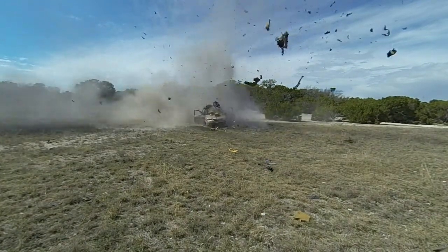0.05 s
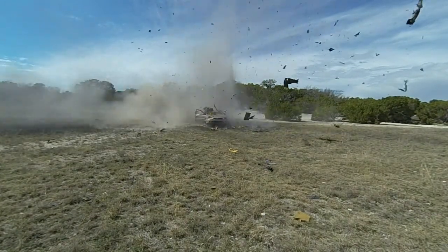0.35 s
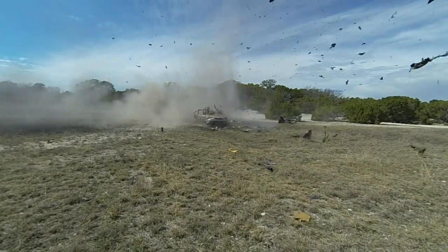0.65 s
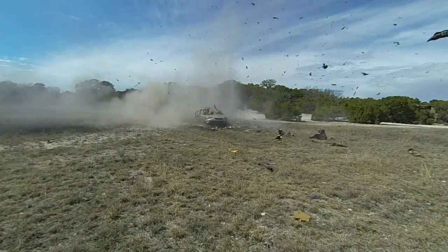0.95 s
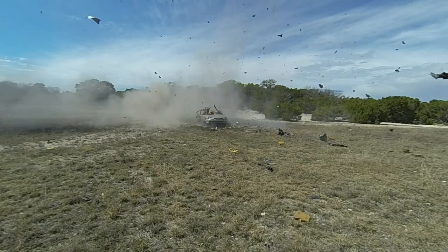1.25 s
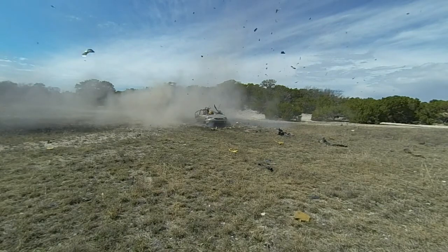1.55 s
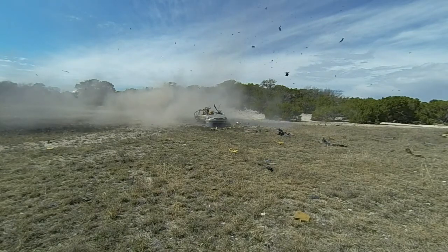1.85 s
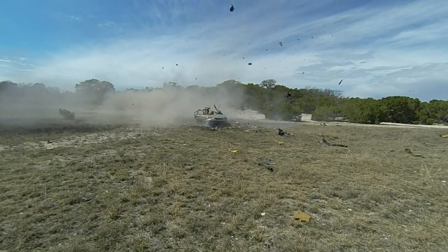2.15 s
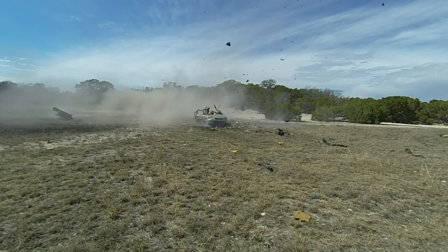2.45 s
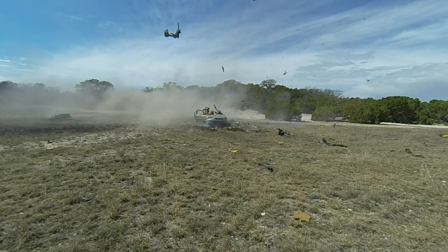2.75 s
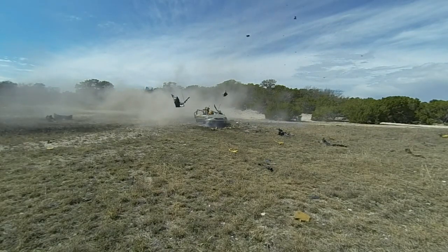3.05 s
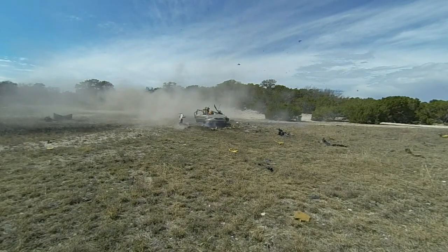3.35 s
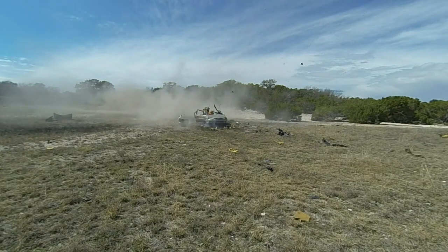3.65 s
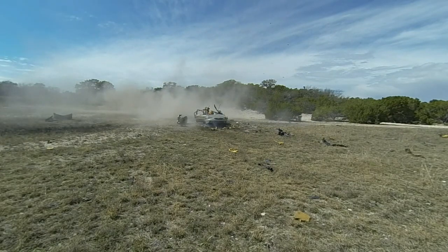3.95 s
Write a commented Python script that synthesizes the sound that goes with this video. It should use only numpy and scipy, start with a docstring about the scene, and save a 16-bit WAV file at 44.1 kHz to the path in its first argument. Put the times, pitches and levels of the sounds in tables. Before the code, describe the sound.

Falling wreckage thuds and cracks in dry grass outdoors while the rumble of a blast fades into wind. The impacts thin out, with one sharp, loud slam, a brief whirr, a second slam and a few faint metal clinks.

```python
"""Wreckage falling after an explosion

The roar of a blast dies away over a dry field, where wind rumbles and an insect trills. Each falling
piece excites a short, damped vibration: clods thud, splinters crack in the grass and steel clinks.
Two heavy panels slam down, one whirring in the air as it sheds eddies. Ground and trees scatter the
impacts, and a limiter ducks under the hardest slam and slowly recovers."""
import sys
import numpy as np
from scipy import signal
from scipy.fft import rfft, irfft
from scipy.io import wavfile
from scipy.ndimage import uniform_filter1d, minimum_filter1d

SR = 44100
rng = np.random.default_rng(int(sys.argv[2]) if len(sys.argv) > 2 else 0)


def file_out(sig):
    """Save sig as 16-bit WAV at sys.argv[1]."""
    # one column per channel
    cols = np.atleast_2d(sig).T
    # limit, then scale
    lim = np.clip(cols, -1, 1)
    pcm = np.round(lim * 32767).astype(np.int16)
    wavfile.write(sys.argv[1], SR, pcm)


N = 4 * SR

# Envelopes of the continuous sounds. Each row: time in seconds, level in dB.
RUMBLE_LEVEL = [(0, -25.5), (.2, -20), (.45, -18.5), (.7, -23.5), (1.1, -29.5), (1.35, -28), (1.7, -29.5),
                (2.0, -35.5), (2.4, -34.5), (2.9, -37), (3.5, -38), (4, -38)]  # the blast sinking into the wind
ROAR_LEVEL = [(0, -19.5), (.2, -15.5), (.33, -18.5), (.5, -21), (.62, -21), (.75, -30.5), (1.05, -34),
              (1.45, -37), (2.0, -43), (2.6, -44.5), (2.9, -39.5), (3.4, -45), (4, -50.5)]
WHIRR_LEVEL = [(0, -76), (2.2, -52), (2.36, -27), (2.62, -40.5), (2.78, -35.5), (2.95, -40.5), (3.2, -54.5),
               (3.3, -77)]
PATTER_LEVEL = [(0, -53), (.6, -49.5), (1.1, -57), (1.9, -55.5), (2.6, -58), (3.0, -54), (4, -60)]

# Spectra of the sources and of the echo. Each row: frequency in Hz, relative level in dB.
AIR_SPECTRUM = [(100, 8.5), (900, 13.5), (1300, -11), (2000, -6), (3500, -5.5), (6000, -24),
                (8200, -42), (9600, -24), (11000, -20), (15000, -27)]
RUMBLE_SPECTRUM = [(12, -27.5), (25, -2.5), (42, -2.5), (60, -9), (100, -17.5), (200, -36.5), (500, -91.5)]
ROAR_SPECTRUM = [(25, -20.5), (85, 2), (190, -1.5), (320, -4), (600, -9), (830, -8), (1280, -23),
                 (1780, -21), (2400, -32.5), (3100, -27), (5500, -57), (7000, -48), (8100, -66),
                 (9500, -47.5), (11000, -58.5), (12500, -59), (15000, -65)]
STALK_SPECTRUM = [(300, -34), (1200, -3.5), (1900, 6), (2500, 2), (3300, -2), (5500, -11), (8000, -16),
                  (9600, -19.5), (12500, -24), (15000, -33)]
CRACK_SPECTRUM = [(300, -50), (1100, -2.5), (2000, 4.5), (3400, -2.5), (4800, -7), (8000, -34),
                  (15000, -45)]
SNAP_SPECTRUM = [(1500, 6), (4500, -1.5), (6700, 5), (8000, -6.5), (9400, 7), (10600, -3.5), (12000, 1),
                 (13500, -11), (15000, -11)]
SOIL_SPECTRUM = [(30, -22.5), (100, 6), (450, -1.5), (650, 1.5), (870, 1), (1280, -13), (1800, -12.5),
                 (3000, -43.5), (6000, -57), (15000, -64)]
GRIT_SPECTRUM = [(300, -31), (1200, -6.5), (1800, 12.5), (2400, -2), (3300, 0.5), (5500, -15), (8000, -17),
                 (10000, -34), (15000, -29)]
CRUMPLE_SPECTRUM = [(30, -20), (90, -1.5), (160, -11), (250, -8.5), (340, -1), (435, 4.5), (600, -6.5),
                    (820, -2), (1300, -19.5), (1750, -17.5), (3200, -27.5), (6000, -51.5), (10000, -54),
                    (15000, -61)]
TREE_ECHO_SPECTRUM = [(40, -14.5), (180, -1), (500, -1), (900, 4), (1500, -2.5), (4000, -4), (15000, -63)]

# Bands of the whirr. Each row: centre in Hz, width as a share of the centre, relative level in dB.
WHIRR_BANDS = [(173, 0.24, -3.5), (239, 0.18, -5.5), (300.3, 0.078, -8)]
# Modes of a steel scrap. Each row: frequency in Hz, relative level in dB, seconds to fall by 60 dB.
STEEL_MODES = [(2100, -3, .1), (2420, -11, 0.073), (3140, -9, .08), (4600, -7, 0.16), (5700, 0, .07),
               (6270, -23, 0.12), (6780, -6, 0.12), (9240, -11, .1), (10200, -18, .14), (9170, 0, 0.12),
               (11800, 1, 0.077), (11700, -13, .08)]
# Steel scraps landing. Each row: start in seconds, level in dB.
CLINKS = [(0.253, -47), (0.538, -43), (1.739, -52), (3.068, -40), (3.109, -46), (3.625, -56)]
# Splinters landing. Each row: start in seconds, crack level in dB, snap level in dB, decay in seconds.
SPLINTERS = [(.090, -41, -44, .002), (.103, -25.5, -33, 0.0046), (0.246, -32, -45, 0.041),
             (.408, -18.5, -56, 0.004), (.455, -29, -36, 0.0021), (0.539, -31, -37.5, 0.0046),
             (0.566, -66, -52, 0.013), (0.59, -40, -37.5, 0.0032), (0.638, -21, -64, 0.0017),
             (.652, -35, -49, .003), (0.746, -42, -53, 0.0063), (0.813, -41, -68, 0.013),
             (.870, -31.5, -43, .002), (0.947, -30.5, -37.5, 0.0033), (0.951, -37, -53, 0.022),
             (1.101, -35.5, -39, 0.0018), (1.120, -38, -65, 0.01), (1.184, -47, -39.5, 0.0018),
             (1.201, -23, -42, .001), (1.290, -39, -53, 0.0021), (1.325, -36.5, -57, 0.021),
             (1.382, -51, -49, 0.0015), (1.433, -37.5, -50, 0.0011), (1.576, -33, -41, 0.0043),
             (1.738, -39, -49, 0.0093), (1.794, -34.5, -40, 0.0041), (2.003, -36, -48, 0.0041),
             (2.137, -31, -49, 0.027), (2.290, -32.5, -60, 0.0073), (2.326, -16.5, -28.5, 0.0027),
             (2.357, -31.5, -25, 0.0022), (2.468, -39.5, -44, 0.0089), (2.620, -42.5, -73, 0.0099),
             (2.817, -49, -64, 0.014), (2.906, -30, -37, 0.0016), (2.999, -47, -51, 0.018),
             (3.057, -45, -38.5, 0.0041), (3.069, -22.5, -23.5, 0.0047), (3.264, -31, -41, 0.0044),
             (3.409, -23.5, -32, 0.0019), (3.522, -45, -50, 0.016), (3.624, -67, -50.5, 0.02),
             (3.803, -31.5, -49, .011)]
# Big pieces landing. Each row: start in seconds, level in dB, pitch in Hz, decay in seconds.
BOOMS = [(1.284, -12, 33.3, 0.023), (1.7364, -7, 49.5, 0.022), (3.239, -6.5, 137, 0.016)]
# Clods and fragments landing. Each row: start in seconds, level in dB, pitch in Hz, decay in seconds,
# grit level in dB relative to the knock.
THUDS = [(0.107, -12, 490, 0.0057, -9.5), (.121, -11, 756, 0.013, -35), (.176, -10.5, 238, 0.0028, -24),
         (0.212, -16, 140, 0.043, -19.5), (.347, -25.5, 540, 0.0092, -6),
         (0.385, -14.5, 460, 0.0085, -11.5), (0.408, -10, 396, 0.0085, -15.5),
         (.538, -11, 470, 0.0081, -18), (0.585, -15.5, 294, 0.018, -28), (.632, -17, 400, 0.018, -17),
         (0.894, -18.5, 124.4, 0.033, -25), (1.003, -21, 860, 0.0066, -12.5),
         (1.129, -28.5, 446, 0.008, -19), (1.322, -13, 755, 0.0039, -20.5),
         (1.526, -19.5, 606, 0.0065, -21), (1.564, -18, 417, 0.021, -12.5), (1.734, -21, 313, 0.0045, -11),
         (1.777, -26.5, 180, 0.027, -17), (1.825, -24, 323, 0.027, -15), (1.906, -35, 860, 0.0078, -33),
         (2.051, -24.5, 383, 0.004, -17.5), (2.322, -19.5, 243, 0.056, -24), (2.352, -28, 555, 0.046, -14),
         (2.697, -32, 710, 0.0049, -36), (2.750, -38, 200, 0.012, -33), (2.904, -21.5, 330, 0.0027, -27),
         (3.028, -25, 324, .009, -21), (3.071, -20, 324, 0.0045, -21), (3.535, -25, 507, 0.0027, -5),
         (3.654, -25.5, 630, 0.0085, -34), (3.804, -22, 457, 0.003, -20), (3.935, -31.5, 467, 0.0037, -45)]
# Heavy panels landing. Each row: start in seconds, slap level in dB, slap pitch in Hz,
# flapping decay in seconds, crumple level in dB, crumple decay in seconds.
PANELS = [(2.1015, 10.5, 369, 0.0014, -6.5, 0.029), (3.2359, -3, 344, .022, -10, 0.02)]


def undb(db):
    """Decibels to amplitude gain."""
    return 10 ** (np.asarray(db) / 20)


def unit(x):
    """Scale to rms 1."""
    return x / np.sqrt(np.mean(x ** 2))


def envelope(rows):
    """Gain over time, interpolated in decibels."""
    return undb(np.interp(np.arange(N) / SR, *np.array(rows).T))


def colour(x, spectrum, size=4096):
    """A minimum-phase filter of unit power imposes a spectrum."""
    hz, db = np.array(spectrum, float).T
    bins_hz = np.maximum(np.fft.rfftfreq(size, 1 / SR), 1)
    gain = undb(np.interp(np.log(bins_hz), np.log(hz), db))
    cepstrum = irfft(np.log(gain))
    cepstrum[1:size // 2] *= 2  # folding makes the filter causal
    cepstrum[size // 2 + 1:] = 0
    response = irfft(np.exp(rfft(cepstrum)))
    return signal.fftconvolve(x, response / np.linalg.norm(response))[:len(x)]


def resonate(x, hz, width):
    """A second-order resonance whose bandwidth is a share of its centre frequency."""
    return signal.lfilter(*signal.iirpeak(hz, 1 / width, fs=SR), x)


def add(out, start_s, x):
    """Superpose a sound at its start time."""
    i = int(start_s * SR)
    out[i:i + len(x)] += x[:N - i]


def grains(per_s, spread_db):
    """A Poisson train of clicks, mostly small and a few large."""
    clicks = (rng.random(N) < per_s / SR) * rng.choice([-1, 1], N)
    return clicks * undb(spread_db * np.minimum(rng.exponential(size=N), 2 * np.e))


def crush(noise, decay_s, attack_share=0.08):
    """Uneven micro-impacts decay exponentially; the shorter the crush, the faster it builds."""
    t = np.arange(len(noise)) / SR
    attack = 1 - np.exp(-t / (attack_share * decay_s))
    return noise * np.abs(noise) ** .5 * np.exp(-t / decay_s) * attack


def at_level(x, db, decay_s):
    """Give a sound the energy of an exponential decay that starts at this level."""
    return x / np.linalg.norm(x) * undb(db) * np.sqrt(decay_s * SR / 2)


def air():
    """Steady filtered noise is the faint hiss of the open air."""
    return undb(-55.5) * colour(rng.standard_normal(N), AIR_SPECTRUM)


def insect(pitch_hz=7460, sweep_hz=354, strokes_per_s=61):
    """Stridulation: uneven wing strokes, each a short rising chirp, merge into a trill."""
    def wander():
        return unit(uniform_filter1d(rng.standard_normal(N), SR // 60))
    stroke = np.cumsum(strokes_per_s * (1 + 0.12 * wander())) / SR % 1
    hz = pitch_hz + sweep_hz * (stroke - .5) + 90 * wander()
    amplitude = np.sin(np.pi * stroke) * undb(wander())
    return undb(-73) * unit(amplitude * np.sin(2 * np.pi * np.cumsum(hz) / SR))


def blast():
    """Countless far impacts add incoherently into a roar above the deep rumble of blast and wind."""
    rumble = unit(colour(rng.standard_normal(N), RUMBLE_SPECTRUM, size=16384))
    rumble /= np.sqrt(uniform_filter1d(rumble ** 2, SR // 10))  # even out chance swells
    impacts = unit(grains(per_s=900, spread_db=2.5))
    roar = unit(colour(impacts + undb(-4.5) * rng.standard_normal(N), ROAR_SPECTRUM))
    return rumble * envelope(RUMBLE_LEVEL) + roar * envelope(ROAR_LEVEL)


def whirr():
    """Vortex shedding: eddies leave a tumbling panel and sound in narrow bands of noise."""
    eddies = rng.standard_normal(N)
    bands = sum(undb(db) * unit(resonate(resonate(eddies, hz, width), hz, width))
                for hz, width, db in WHIRR_BANDS)
    return unit(bands) * envelope(WHIRR_LEVEL)


def patter(decay_s=0.0018):
    """Fine grit falls into the grass, and the energies of its tiny impacts add into a rustle."""
    decay = np.exp(-np.arange(SR // 20) / SR / decay_s)
    energy = signal.fftconvolve(grains(per_s=470, spread_db=3.5) ** 2, decay)[:N]
    rustle = np.sqrt(np.abs(energy)) * rng.standard_normal(N)
    return unit(colour(rustle, STALK_SPECTRUM)) * envelope(PATTER_LEVEL)


def clinks(contact_s=0.0054):
    """A brief scrape on landing excites the inharmonic modes of each steel scrap."""
    out, t = np.zeros(N), np.arange(SR // 3) / SR
    ring = sum(undb(db) * np.sin(2 * np.pi * hz * t) * np.exp(-np.log(1000) * t / t60)
               for hz, db, t60 in STEEL_MODES)
    for start_s, db in CLINKS:
        scrape = crush(rng.standard_normal(SR // 8), contact_s)
        add(out, start_s, at_level(signal.fftconvolve(scrape, ring), db, contact_s))
    return out


def fracture(noise, decay_s, click_size=0.48):
    """Brittle contact gives one sharp impulse and a short crush."""
    crunch = crush(noise, decay_s)
    return crunch / np.linalg.norm(crunch) + click_size * signal.unit_impulse(len(noise), SR // 1000)


def splinters(ring_hz=2620):
    """Small hard bits crack, each exciting a resonance of its own, and snap dry stalks."""
    out = np.zeros(N)
    for start_s, crack_db, snap_db, decay_s in SPLINTERS:
        crack_noise, snap_noise = rng.standard_normal((2, SR // 6))
        force = fracture(crack_noise, decay_s)
        detune = np.exp(0.358 * np.tanh(crack_noise[-1]))  # random for each piece
        ring = undb(3) * resonate(force, ring_hz * detune, width=.07)
        crack = colour(force + ring, CRACK_SPECTRUM)
        snap = colour(fracture(snap_noise, decay_s), SNAP_SPECTRUM)
        add(out, start_s, at_level(crack, crack_db, decay_s))
        add(out, start_s, at_level(snap, snap_db, decay_s))
    return out


def booms():
    """Each big piece sets the ground into a deep, heavily damped oscillation."""
    out, t = np.zeros(N), np.arange(SR // 3) / SR
    for start_s, db, hz, decay_s in BOOMS:
        attack = np.minimum(t * hz * 2, 1)  # half a cycle
        add(out, start_s, -undb(db) * np.sin(2 * np.pi * hz * t) * np.exp(-t / decay_s) * attack)
    return out


def thuds():
    """Each impact drives a broad resonance, damped by the soil, and a hollow ring, and throws up grit."""
    out = np.zeros(N)
    for start_s, db, hz, decay_s, grit_db in THUDS:
        force, spray = (crush(noise, decay_s) for noise in rng.standard_normal((2, SR // 4)))
        hollow = undb(-7) * resonate(force, hz, width=0.086)
        knock = colour(resonate(force, hz, width=1.22) + hollow, SOIL_SPECTRUM)
        add(out, start_s, at_level(knock, db, decay_s))
        add(out, start_s, at_level(colour(spray, GRIT_SPECTRUM), db + grit_db, decay_s))
    return out


def slap(hz, width_cycles=0.24):
    """Air under a flat face radiates one compression and one rarefaction."""
    cycles = np.arange(int(2 * SR / hz)) * hz / SR
    offset = (cycles - .65) / width_cycles
    attack = np.minimum(cycles * 4, 1) ** 2
    return -offset * np.exp((1 - offset ** 2) / 2) * attack


def panels(flap_gap_s=.0044, flap_scatter=.35):
    """A flat panel slaps the ground, flaps against it in uneven, decaying rebounds and crumples."""
    out = np.zeros(N)
    for start_s, slap_db, hz, flap_decay_s, crumple_db, crumple_s in PANELS:
        gap_ratios, pitch_ratios = np.exp(flap_scatter * rng.uniform(-1.58, 1.724, size=(2, 9)))
        add(out, start_s, undb(slap_db) * slap(hz))
        for delay_s, ratio in zip(np.cumsum(flap_gap_s * gap_ratios), pitch_ratios):
            rebound = undb(slap_db) * np.exp(-delay_s / flap_decay_s)
            add(out, start_s + delay_s, rebound * slap(hz * ratio))
        crumple = colour(crush(rng.standard_normal(SR // 3), crumple_s), CRUMPLE_SPECTRUM)
        add(out, start_s + 0.000865, at_level(crumple, crumple_db, crumple_s))
    return out


def reflections(x, ground_s=0.015, ground_db=-10.5, trees_s=0.16, trees_db=-26):
    """Diffuse reflection adds a short scatter off rough ground and a dull tail from the tree line."""
    t = np.arange(SR) / SR
    ground = rng.standard_normal(SR) * np.exp(-t / ground_s)
    trees = colour(rng.standard_normal(SR) * np.exp(-t / trees_s), TREE_ECHO_SPECTRUM)
    ground *= undb(ground_db) / np.linalg.norm(ground)
    trees *= undb(trees_db) / np.linalg.norm(trees)
    return x + signal.fftconvolve(x, ground + trees)[:N]


def scene():
    """Superposition in one channel: the continuous sounds, the wreckage and its reflections."""
    background = air() + blast() + insect() + whirr()
    wreckage = panels() + booms() + clinks() + thuds() + splinters() + patter()
    return (background + reflections(wreckage))[None]


def record(dry, ceiling_db=2, recover_db_per_s=8.5, cutoff_hz=15300):
    """Peak limiting: the gain drops at once and recovers slowly; a low-pass cuts the top."""
    recovery_db = recover_db_per_s * np.arange(N) / SR
    excess_db = np.maximum(20 * np.log10(np.abs(dry[0]) + 1e-9) - ceiling_db, 0)
    duck_db = np.maximum.accumulate(excess_db + recovery_db) - recovery_db
    gain = uniform_filter1d(minimum_filter1d(undb(-duck_db), size=129), size=129)
    lowpass = signal.ellip(8, .2, 80, cutoff_hz, fs=SR, output="sos")
    return signal.sosfilt(lowpass, dry * gain)


dry = scene()
out = record(dry)
file_out(out)
```